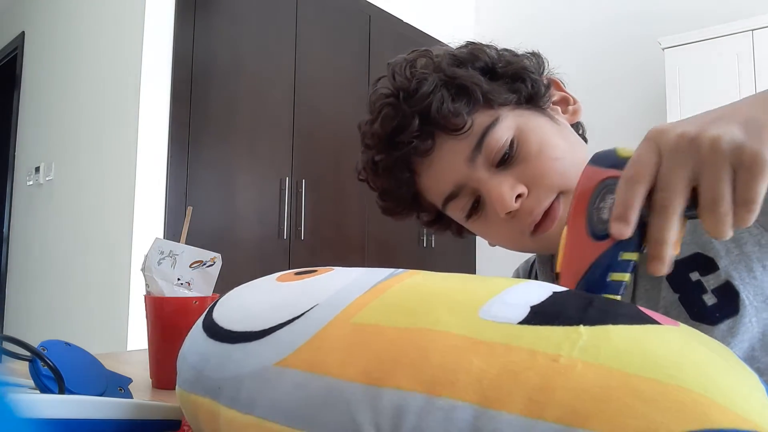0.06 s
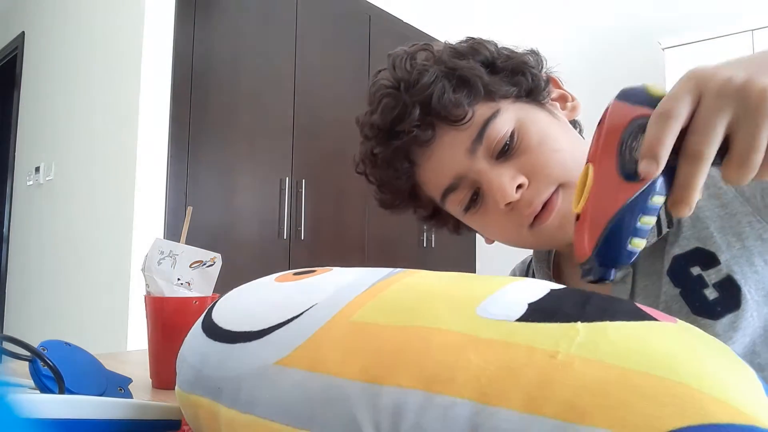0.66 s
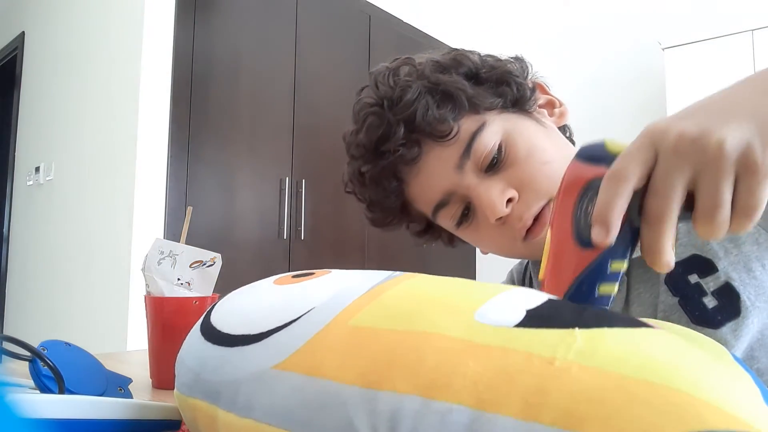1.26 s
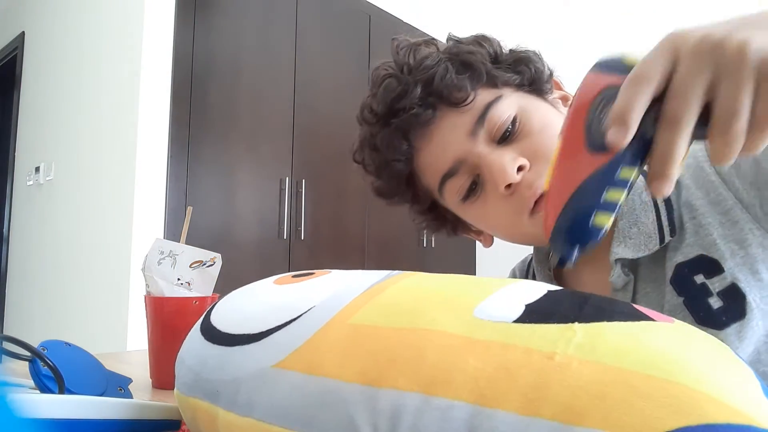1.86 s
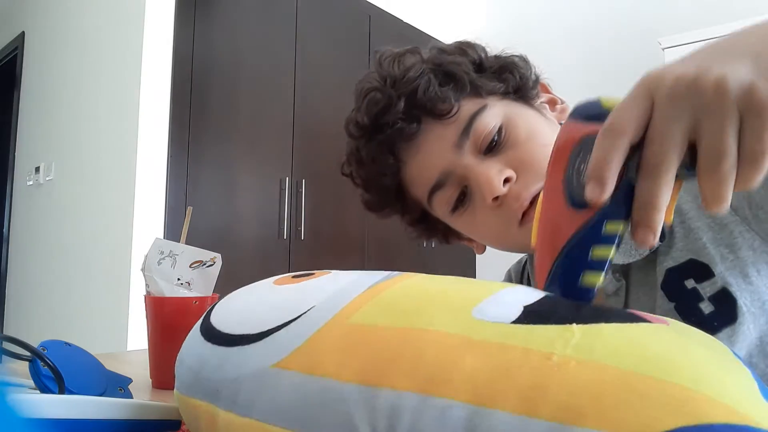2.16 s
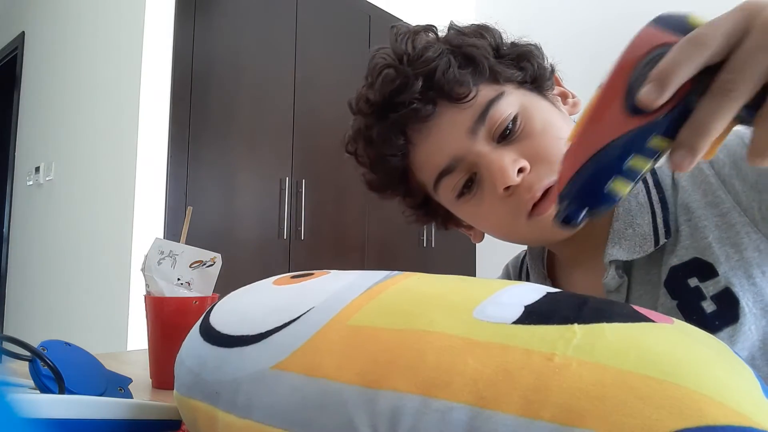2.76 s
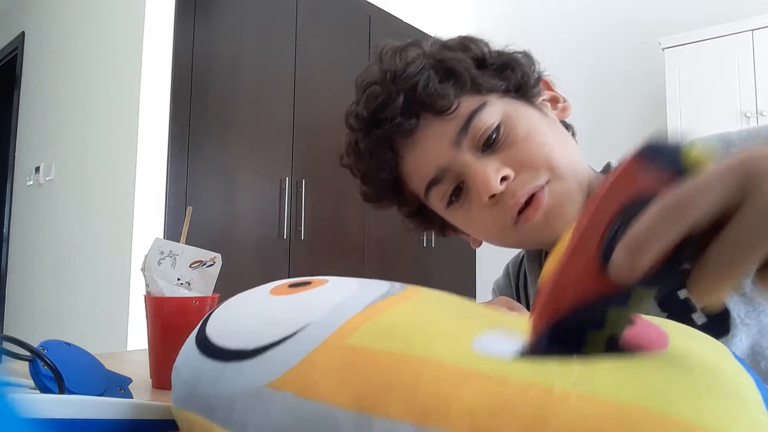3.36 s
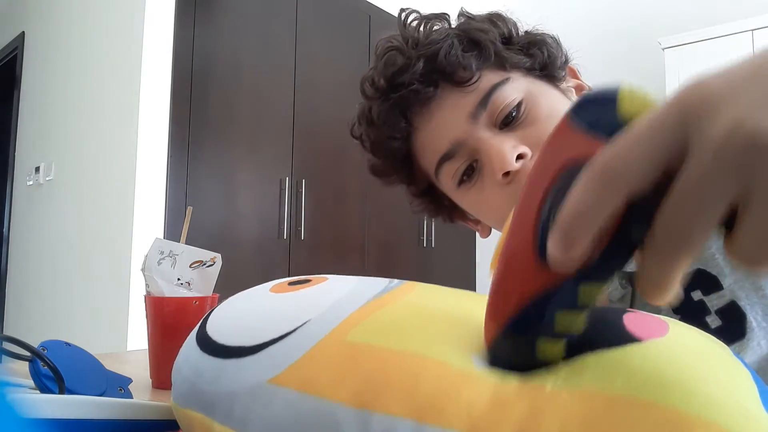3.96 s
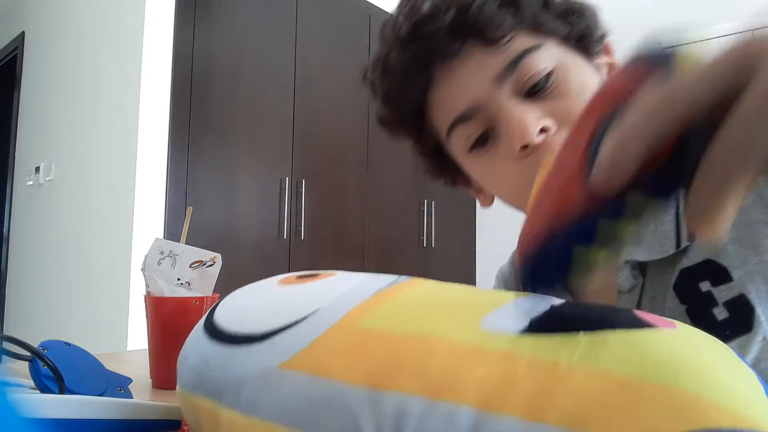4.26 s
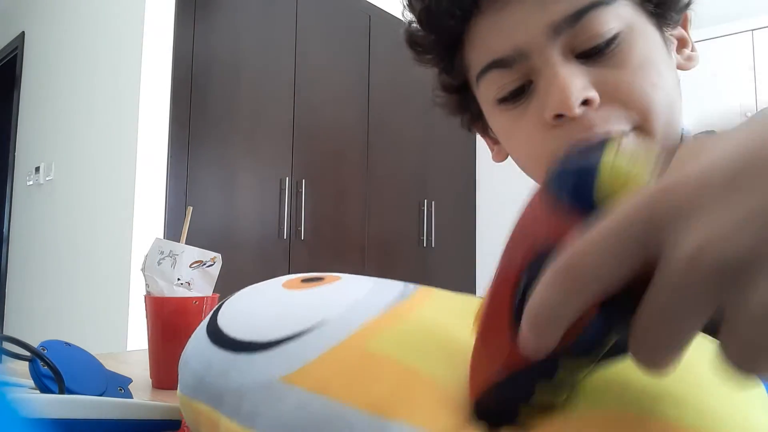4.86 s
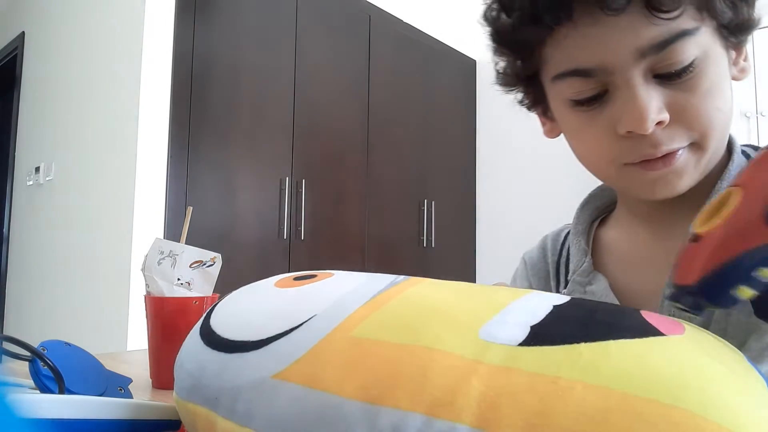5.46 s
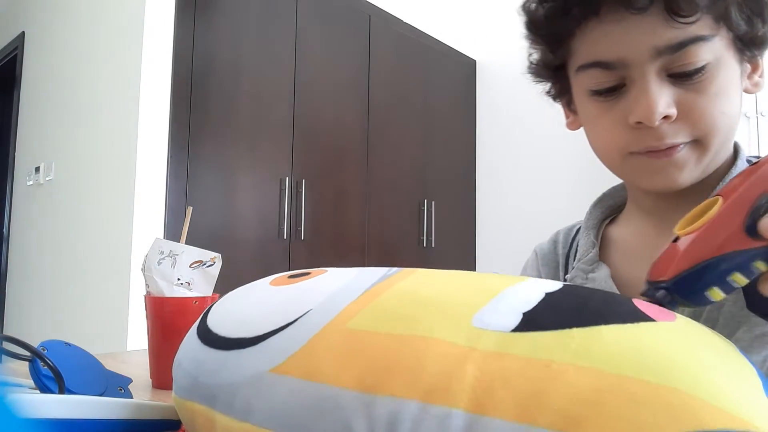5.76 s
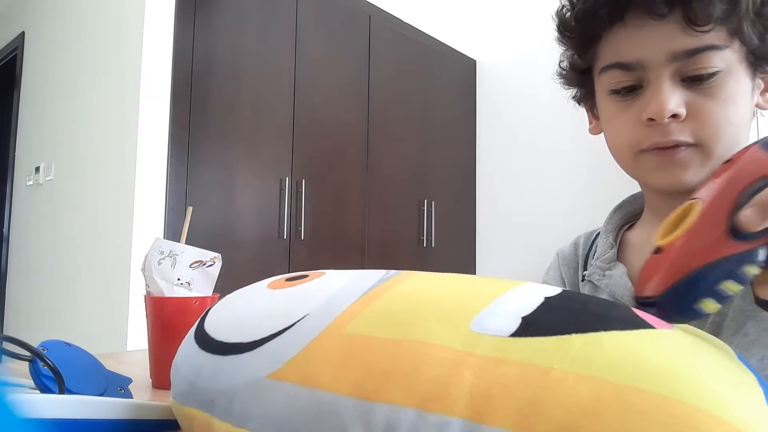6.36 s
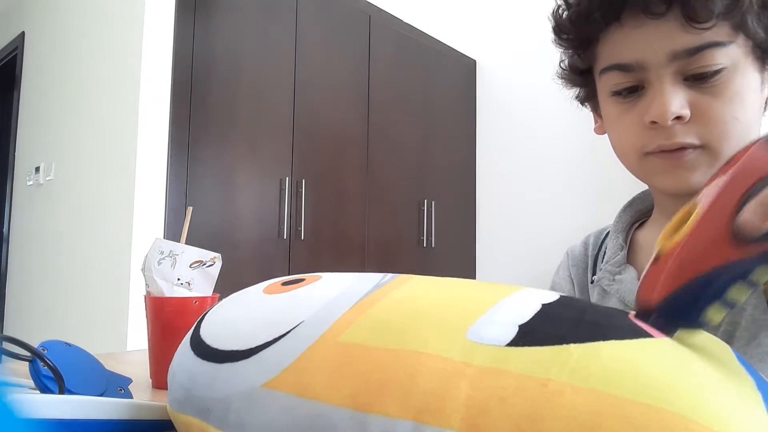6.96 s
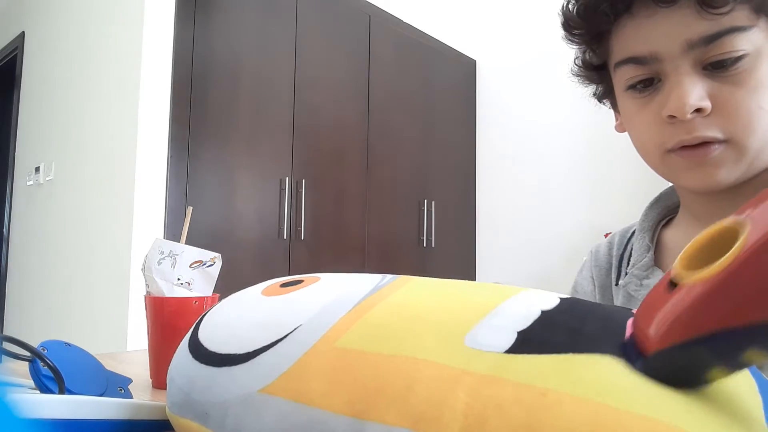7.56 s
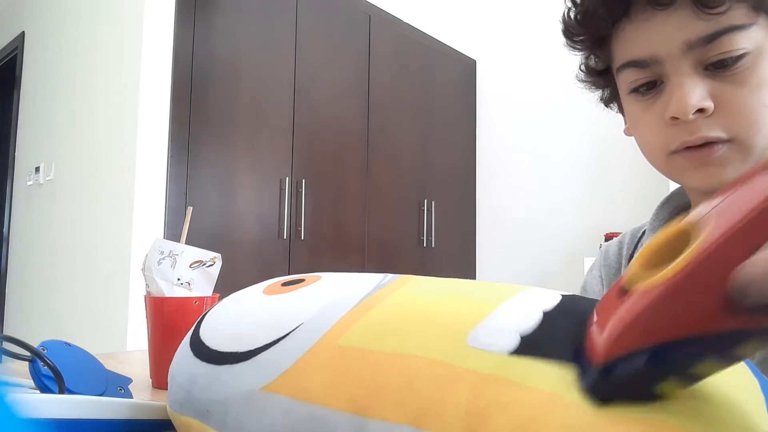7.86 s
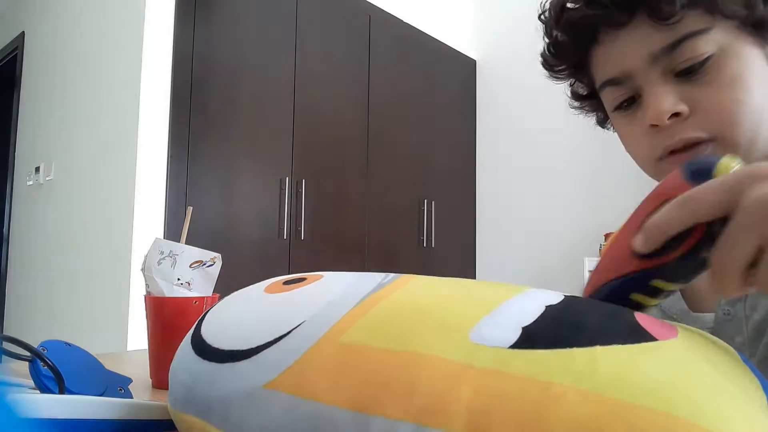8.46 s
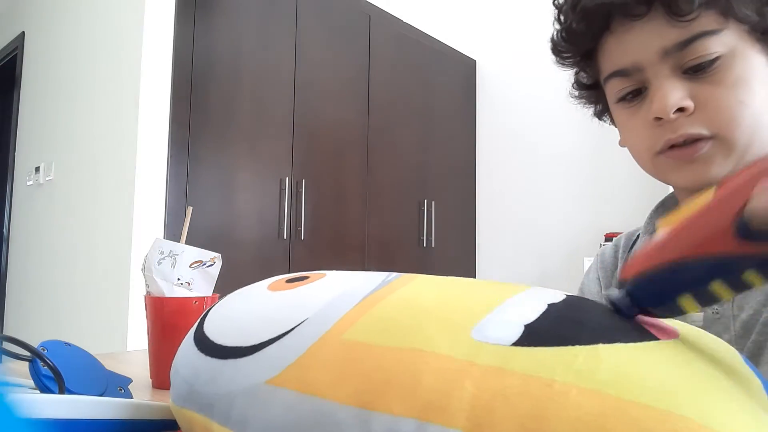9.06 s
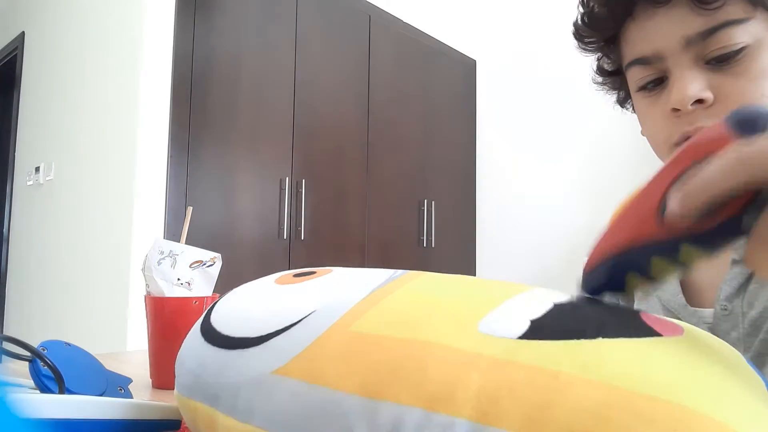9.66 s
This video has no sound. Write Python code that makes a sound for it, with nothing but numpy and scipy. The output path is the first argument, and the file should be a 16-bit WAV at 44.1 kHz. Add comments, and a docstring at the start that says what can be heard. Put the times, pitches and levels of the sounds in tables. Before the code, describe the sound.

A hollow plastic toy tool's trigger snaps and clicks, slowly at first and then rapidly, in a quiet, slightly echoing room.

```python
"""The trigger of a hollow plastic toy tool is squeezed in a bare, quiet room, slowly, then quickly. With each
squeeze the trigger creaks, a catch clicks and a spring slams a striker into the casing; on letting go, the
trigger knocks against its stop. Each hit is a short burst of noise shaped by the casing, and the walls ring on
after it. Loose parts tick, fingers tap and slip, and the toy bumps the table once. Faint air and hum lie
underneath, and a limiter flattens the loudest peaks."""
import sys
import numpy as np
from scipy import signal
from scipy.fft import rfft, irfft, next_fast_len
from scipy.io import wavfile
from scipy.ndimage import uniform_filter1d, minimum_filter1d

SR = 44100
rng = np.random.default_rng(int(sys.argv[2]) if len(sys.argv) > 2 else 0)


def persist_wave(psi):
    """Save psi, clipped to +-1, as 16-bit WAV."""
    counts = np.round(np.clip(psi, -1, 1) * 32767).astype(np.int16)
    wavfile.write(sys.argv[1], SR, np.atleast_2d(counts).T)


N = 427769
HIT_SAMPLES = 32768  # room for one hit and its echo

# the tone of the room's steady air: (frequency [Hz], level [dB])
AIR_TONE = [(25, -25), (50, -9), (75, -11.5), (170, 1.5), (260, -2), (400, -4), (520, -13.5), (1050, -18),
            (1300, -25), (1600, -18), (3600, -25), (5000, -23), (7400, -34), (9000, -45.5), (15000, -47)]
# faint household hum and whine: (frequency [Hz], width [Hz], level compared with the air [dB])
HUM_BANDS = [(87, 9, -6), (194.6, 4.5, -7.5), (1090, 15, -24), (1580, 40, -21.5)]
# how loud air and hum are together: (time [s], level [dB])
BACKGROUND_LEVEL = [(0.0, -53), (6.05, -55.5), (6.29, -52.5), (7.38, -51), (8.08, -56), (9.7, -52.5)]
# how long the echo takes to fade by 60 dB, called t60 below: (frequency [Hz], fade time [s])
ECHO_FADE = [(300, 2.25), (1000, 0.6652), (3000, 0.584), (6000, 0.5069), (9000, 0.4651), (15000, 0.3246)]
# the tone of the echo: (frequency [Hz], level [dB])
ECHO_TONE = [(300, 2.5), (700, -12.5), (1100, 1.5), (3000, 1), (7000, 3), (10000, 1), (15000, -3.5)]
# pitches at which the casing likes to ring: (frequency [Hz], width [Hz], boost [dB])
CASING_RINGS = [(624, 310, 4.5), (991, 180, 4), (1240, 200, 3), (1722, 61, 4), (2201, 120, 4),
                (2550, 240, 3), (3028, 32, 2), (3600, 150, 3.5), (4204, 130, 1), (4460, 290, 1),
                (4837, 190, 3.5), (5400, 450, 1.5), (6610, 330, 2), (7410, 200, 5), (12300, 1400, 2.5)]
# the casing's main ring rises as the grip tightens: (time [s], frequency [Hz])
GRIP_RING = [(0, 1015), (6.9, 984), (7.3, 1254), (8.4, 1080), (9.3, 1164)]
# the tone of light plastic contacts: (frequency [Hz], level [dB])
LIGHT_TONE = [(100, -30.5), (470, -24.5), (640, -11.5), (840, -10), (1100, -8), (1500, -9), (2500, -3.5),
              (4300, -1.5), (6500, -4), (8800, -14), (12000, -16), (15500, -17)]
# the tone of the striker's hard blow: (frequency [Hz], level [dB])
STRIKER_TONE = [(100, -28.5), (480, -24), (640, -14.5), (840, -13.5), (1100, -9), (1500, -10.5),
                (2400, -4.5), (4300, -1.5), (6500, -4), (8800, -13), (12000, -11), (15500, -10.5)]
# thin tones of the steel spring: (frequency [Hz], level [dB], fade time [s])
SPRING_TONES = [(2750, 0, .45), (4880, 2, .55), (6160, -3, .45), (8210, -2.5, .5), (9900, -6, .4)]
# loose parts tick as the toy is moved: (time [s], level [dB], treble boost [dB], ring [Hz])
LOOSE_TICKS = [(2.192, -42.5, -36, 2480), (3.162, -48.5, -7, 4250), (3.2, -37.5, -5, 4180),
               (3.884, -48, -12, 2750), (4.048, -35, -3, 4110), (4.271, -29.5, -14, 2350),
               (4.754, -49.5, -18, 2890), (4.885, -38.5, -5, 3660), (5.103, -32.5, -11, 2360),
               (5.296, -35, 4, 4870), (5.491, -40, 6, 4870), (5.772, -47.5, 3, 4800), (7.138, -44, 7, 2350),
               (8.186, -29, 5, 4200), (9.183, -21, 18, 6200), (9.385, -26, 12, 6800),
               (9.422, -30.5, 13, 4880), (9.51, -37, -37, 2380), (9.533, -38, 0, 4920),
               (9.636, -32.5, 7, 5860)]
# fingers knock on the hollow body: (time [s], level [dB], pitch [Hz])
FINGER_TAPS = [(6.312, -37, 954), (6.971, -41, 846), (7.784, -40, 804)]
# the toy bumps the table: (time [s], level [dB])
TABLE_BUMP = (7.982, -26)
# the casing slips in the hand: (time [s], level [dB], squeak pitch [Hz])
HAND_SLIP = (9.572, -26.5, 5050)
# one row for each squeeze of the trigger: (catch time [s], snap time [s], return time [s],
# catch level [dB], return level [dB], snap ring [Hz], return ring [Hz])
TRIGGER_SQUEEZES = [(-0.22, -0.161, 0.012, -23, -41, 4150, 3850),
                    (0.365, 0.412, 0.643, -25, -19, 4770, 4260),
                    (1.339, 1.387, 1.624, -22.5, -21, 5200, 3640),
                    (2.32, 2.344, 2.564, -25.5, -20.5, 3430, 3830),
                    (3.213, 3.259, 3.491, -23, -18.5, 4000, 3720),
                    (4.059, 4.103, 4.318, -21.5, -18, 4480, 4600),
                    (4.899, 4.923, 5.154, -23.5, -16, 4330, 3800),
                    (6.126, 6.165, 6.38, -25, -17, 4750, 3840), (6.734, 6.779, 7.02, -23, -18, 5180, 2750),
                    (7.267, 7.317, 7.512, -20.5, -15, 3440, 3040),
                    (7.645, 7.673, 7.823, -14, -19.5, 4280, 2420),
                    (7.941, 7.98, 8.098, -15, -17.5, 4320, 4900),
                    (8.194, 8.226, 8.349, -16, -20.5, 4100, 4540),
                    (8.448, 8.485, 8.61, -20.5, -22.5, 6150, 3560),
                    (8.715, 8.745, 8.864, -23.5, -21.5, 3820, 5320),
                    (8.942, 8.969, 9.124, -19.5, -18, 6450, 2590),
                    (9.199, 9.237, 9.408, -21, -36, 4240, 4900)]


def amp(db):
    """Turn decibels into a number to multiply by."""
    return 10 ** (np.asarray(db) / 20)


def unit(x):
    """Scale a signal to an average (rms) level of 1."""
    return x / np.sqrt(np.mean(x ** 2) + 1e-20)


def unit_hit(x):
    """Give a hit the same energy as 8 ms of sound at level 1."""
    return x / np.linalg.norm(x) * np.sqrt(.008 * SR)


def wobble(length, smoothing):
    """A random wavy line; more smoothing makes it slower."""
    return unit(uniform_filter1d(rng.standard_normal(length), size=smoothing))


def curve_at(points, hz):
    """Read between the rows of a (frequency, value) table, giving each octave equal room."""
    frequencies, values = np.transpose(points)
    return np.interp(np.log(hz + 1), np.log(frequencies), values)


def filtered(x, response):
    """Turn each frequency up or down by response(hz)."""
    size = next_fast_len(len(x) + SR // 4)
    return irfft(rfft(x, size) * response(np.fft.rfftfreq(size, 1 / SR)), size)[:len(x)]


def resonate(x, gain):
    """Shape the tone so that it rings only after a hit, never before (a minimum-phase filter)."""
    cepstrum = irfft(np.log(gain))
    cepstrum[1:len(x) // 2] *= 2
    cepstrum[len(x) // 2 + 1:] = 0
    return irfft(rfft(x) * np.exp(rfft(cepstrum)))


def add(track, time, sound):
    """Mix a sound into the track at a time in seconds."""
    start = round(time * SR)
    part = sound[max(-start, 0):max(len(track) - start, 0)]
    track[max(start, 0):][:len(part)] += part


def background():
    """Room air is soft, low noise; narrow bands of noise make a wavering hum."""
    level_db = np.interp(np.arange(N) / SR, *np.transpose(BACKGROUND_LEVEL))
    air = unit(filtered(rng.standard_normal(N), lambda hz: amp(curve_at(AIR_TONE, hz))))
    hum = np.zeros(N)
    for centre, width, db in HUM_BANDS:
        band = filtered(rng.standard_normal(N), lambda hz: np.exp(-((hz - centre) / width) ** 2))
        hum += amp(db) * unit(band)
    return amp(level_db) * unit(air + hum)


def room_echo(delay_s=.012, rise_s=.0043):
    """The walls ring on, low notes longest. The toy moves, so every echo is new."""
    hz, t, noise = signal.stft(rng.standard_normal(HIT_SAMPLES), SR, nperseg=256)
    level_db = curve_at(ECHO_TONE, hz)[:, None] - 60 * t / curve_at(ECHO_FADE, hz)[:, None]
    echo = signal.istft(noise * amp(level_db), SR, nperseg=256)[1][:HIT_SAMPLES]
    since_arrival = np.maximum(np.arange(HIT_SAMPLES) / SR - delay_s, 0)
    echo *= 1 - np.exp(-since_arrival / rise_s)
    return echo / np.linalg.norm(echo)


def rise_and_fade(rise_s, t60):
    """The loudness of a hit: it swells quickly, then dies away."""
    t = np.arange(HIT_SAMPLES) / SR
    return (1 - np.exp(-(t / rise_s) ** 2)) * amp(-60 * t / t60)


def plastic_click(time, tone, treble_db, ring_hz, ring_db, width_hz, rise_s, t60, grit_db, echo_db):
    """Plastic parts chatter briefly and shake the casing; the room answers."""
    hz = np.fft.rfftfreq(HIT_SAMPLES, 1 / SR)

    def peak(centre, width):
        return 1 / (1 + (2 * (hz - centre) / width) ** 2)

    grit = amp(grit_db * wobble(HIT_SAMPLES, smoothing=16))
    chatter = rng.standard_normal(HIT_SAMPLES) * grit * rise_and_fade(rise_s, t60)
    treble = hz ** 4 / (hz ** 4 + 8000 ** 4)  # picks out what lies above 8000 Hz
    grip_hz = np.interp(time, *np.transpose(GRIP_RING))
    casing_db = curve_at(tone, hz) + treble_db * treble + 6 * peak(grip_hz, width=130)
    casing_db += sum(db * peak(centre, width) for centre, width, db in CASING_RINGS)
    # one ring points straight at the listener; the walls get all the small ones, at random strengths
    direct = resonate(chatter, amp(casing_db + ring_db * peak(ring_hz, width_hz)))
    small_rings_db = 2.1 * wobble(len(hz), smoothing=70)
    echo = resonate(room_echo(), amp(casing_db + small_rings_db))
    return unit_hit(direct) + amp(echo_db) * unit_hit(echo)


def hollow_body(hz, t60, rise_s, echo_db):
    """The air inside the toy rings, at a slightly different pitch each time."""
    t = np.arange(HIT_SAMPLES) / SR
    pitch = hz * (1 + rng.normal(0, .011))
    ring = unit_hit(np.sin(2 * np.pi * pitch * t) * rise_and_fade(rise_s, t60))
    return ring + amp(echo_db) * signal.fftconvolve(ring, room_echo())[:HIT_SAMPLES]


def spring_ring():
    """The slack spring sings on after a jolt."""
    t = np.arange(HIT_SAMPLES) / SR
    ring = np.zeros(HIT_SAMPLES)
    for hz, db, t60 in SPRING_TONES:
        fade = amp(db + rng.normal(0, 2.6) - 60 * t / t60)
        pitch = hz * (1 + rng.normal(0, .0016))
        ring += fade * np.sin(2 * np.pi * pitch * t)
    return ring


def rattle(time, treble_db, ring_hz, spring_db=-27):
    """A loose part rattles once and jolts the spring; a dull rattle jolts it less."""
    chatter = plastic_click(time, LIGHT_TONE, treble_db, ring_hz, ring_db=6.5, width_hz=880,
                            rise_s=.0033, t60=.034, grit_db=4, echo_db=-7.5)
    return chatter + amp(spring_db + min(treble_db, 0)) * spring_ring()


def loose_parts(strays_per_s=2):
    """Moving the toy shakes its parts: clear ticks, with faint stray ones at random times."""
    track = np.zeros(N)
    for time, db, treble_db, ring_hz in LOOSE_TICKS:
        add(track, time, amp(db) * rattle(time, treble_db, ring_hz))
    for time in rng.uniform(0, N / SR, round(strays_per_s * N / SR)):
        add(track, time, amp(rng.normal(-61, 1.5)) * rattle(time, treble_db=-6, ring_hz=4300))
    return track


def table_bump(push_s=.0017):
    """One soft push against the table makes a low thud."""
    time, db = TABLE_BUMP
    age = np.arange(SR // 10) / (push_s * SR)
    push = age * (1 - age / 2) * np.exp(-age)
    track = np.zeros(N)
    add(track, time, amp(db) * unit_hit(push))
    return track


def finger_taps():
    """Soft fingers wake only the low ring of the hollow body."""
    track = np.zeros(N)
    for time, db, hz in FINGER_TAPS:
        add(track, time, amp(db) * hollow_body(hz, t60=.02, rise_s=.0014, echo_db=1))
    return track


def hand_slip():
    """Plastic rubs under the fingers: a longer, gritty chatter squeaks through one narrow ring."""
    time, db, squeak_hz = HAND_SLIP
    squeak = plastic_click(time, LIGHT_TONE, treble_db=1, ring_hz=squeak_hz, ring_db=11, width_hz=250,
                           rise_s=.0064, t60=.23, grit_db=4, echo_db=-9)
    track = np.zeros(N)
    add(track, time, amp(db) * squeak)
    return track


def trigger_creaks(slips=3, travel_s=.07, loudest_db=-43.5, swell_db=14.5):
    """The trigger slips a few times in its guide, louder as it nears the catch."""
    track = np.zeros(N)
    for time, *_ in TRIGGER_SQUEEZES:
        for travel_left in (np.arange(slips) + rng.random(slips)) / slips:
            creak = plastic_click(time, LIGHT_TONE, treble_db=-5.5, ring_hz=4200, ring_db=6,
                                  width_hz=700, rise_s=.0036, t60=.05, grit_db=4, echo_db=-9)
            add(track, time - travel_s * travel_left, amp(loudest_db - swell_db * travel_left) * creak)
    return track


def catch_clicks(regrip_s=4.5):
    """The catch clicks just before each snap; it rings lower once the hand has shifted its hold."""
    track = np.zeros(N)
    for time, _, _, db, *_ in TRIGGER_SQUEEZES:
        ring_hz = 4434 if time < regrip_s else 2600
        click = plastic_click(time, LIGHT_TONE, treble_db=2, ring_hz=ring_hz, ring_db=9, width_hz=360,
                              rise_s=.0045, t60=.023, grit_db=3, echo_db=-7)
        add(track, time, amp(db) * click)
    return track


def trigger_returns(slow_hold_s=.23, bounce_s=.025, bounce_db=-37):
    """The released trigger hits its stop, sounds the hollow body and bounces once."""
    track = np.zeros(N)
    for _, snap_time, time, _, db, _, ring_hz in TRIGGER_SQUEEZES:
        knock = plastic_click(time, LIGHT_TONE, treble_db=5.5, ring_hz=ring_hz, ring_db=9, width_hz=380,
                              rise_s=.0026, t60=.026, grit_db=1, echo_db=-11)
        # letting go twice as soon makes the body 8 dB louder next to the knock
        body_db = -15 + 8 * np.log2(slow_hold_s / (time - snap_time))
        body = amp(body_db) * hollow_body(hz=718, t60=.036, rise_s=.0013, echo_db=-18)
        add(track, time, amp(db) * (knock + body))
        bounce_time = time + bounce_s * np.exp(.2 * rng.standard_normal())
        add(track, bounce_time, amp(bounce_db) * rattle(time, treble_db=-2, ring_hz=ring_hz))
    return track


def striker_snaps(level_db=-1.03):
    """The spring slams the striker into the casing, equally hard each time."""
    track = np.zeros(N)
    for _, time, _, _, _, ring_hz, _ in TRIGGER_SQUEEZES:
        snap = plastic_click(time, STRIKER_TONE, treble_db=2, ring_hz=ring_hz, ring_db=8, width_hz=260,
                             rise_s=.0029, t60=.027, grit_db=1, echo_db=-13.5)
        add(track, time, amp(level_db) * snap)
    return track


def scene():
    """The room, the squeezes and the small handling noises, added up in one channel."""
    room = background()
    squeezes = catch_clicks() + striker_snaps() + trigger_returns()
    handling = finger_taps() + table_bump() + loose_parts() + hand_slip() + trigger_creaks()
    return (room + squeezes + handling)[None]


def limiter(x, ceiling_db, window_samples):
    """Turn the volume down just ahead of each loud peak and back up just after it."""
    needed_gain = np.minimum(1, amp(ceiling_db) / (np.abs(x) + 1e-9))
    held_gain = minimum_filter1d(needed_gain, window_samples)
    return x * uniform_filter1d(held_gain, window_samples)


def record(dry):
    """A fast limiter flattens the snaps, then the deepest bass and highest treble are cut."""
    bass_hz, top_hz = 55, 15900
    limited = limiter(dry[0], ceiling_db=-1.52, window_samples=221)
    thinned = signal.sosfilt(signal.butter(2, bass_hz, "high", fs=SR, output="sos"), limited)
    return filtered(thinned, lambda hz: np.clip((top_hz - hz) / 300 + .5, 0, 1))[None]


dry = scene()
out = record(dry)
persist_wave(out)
```